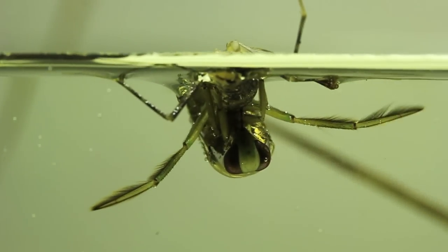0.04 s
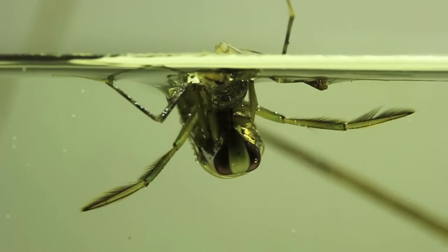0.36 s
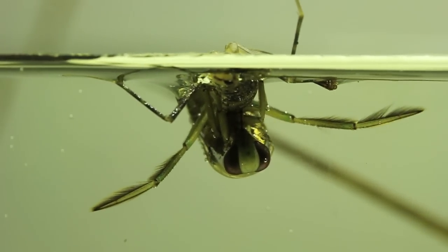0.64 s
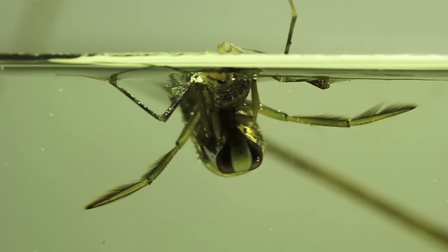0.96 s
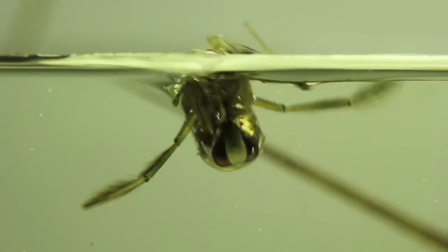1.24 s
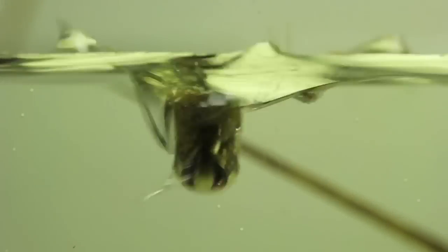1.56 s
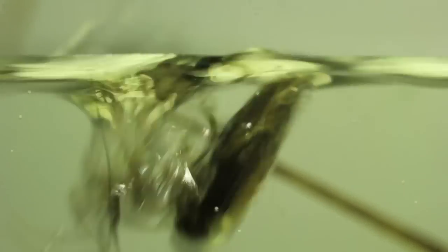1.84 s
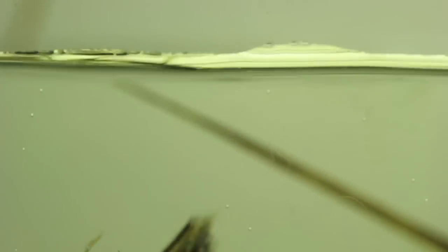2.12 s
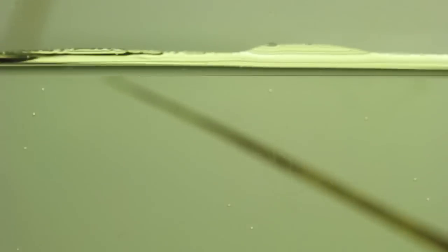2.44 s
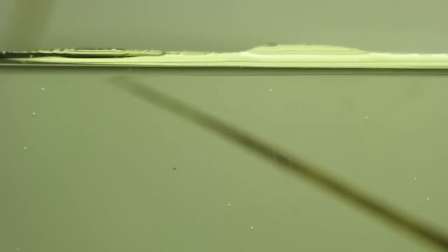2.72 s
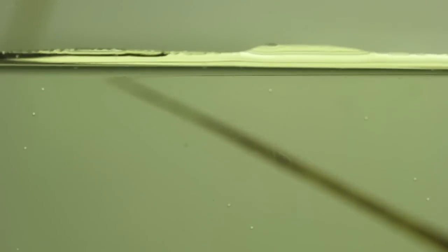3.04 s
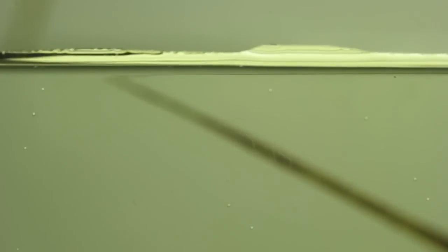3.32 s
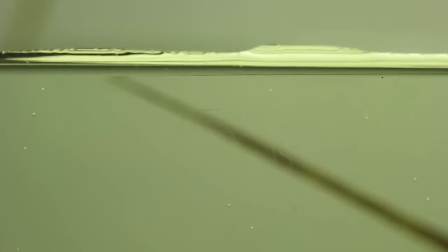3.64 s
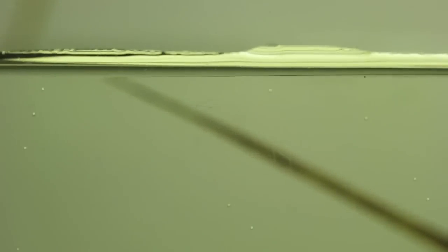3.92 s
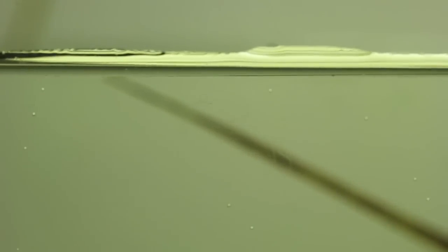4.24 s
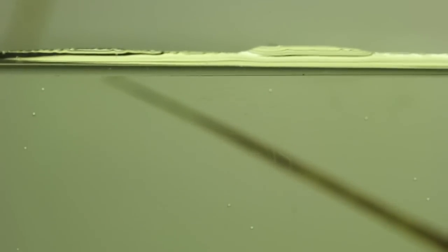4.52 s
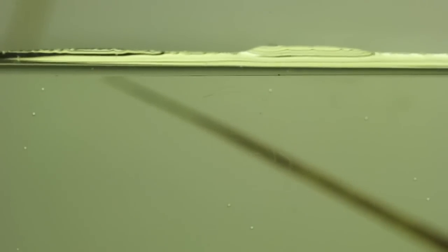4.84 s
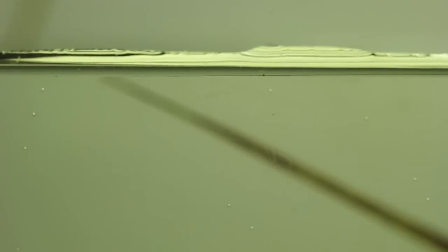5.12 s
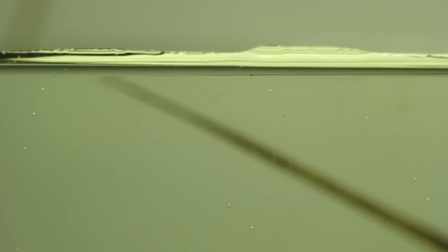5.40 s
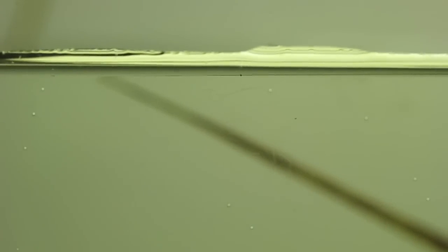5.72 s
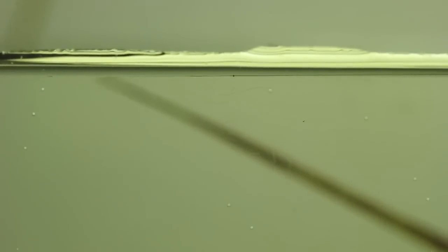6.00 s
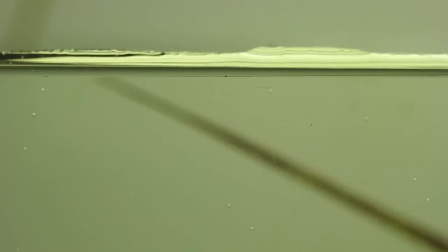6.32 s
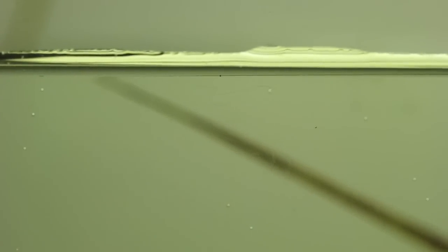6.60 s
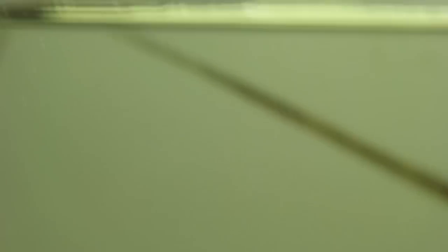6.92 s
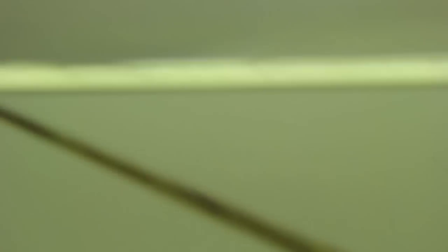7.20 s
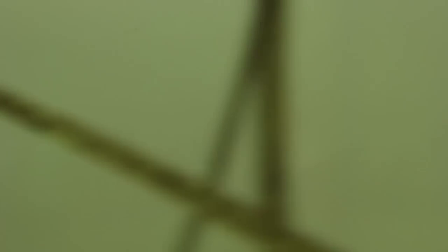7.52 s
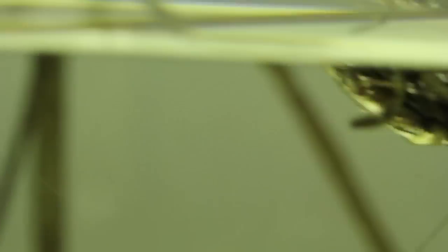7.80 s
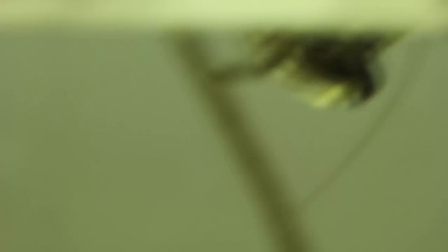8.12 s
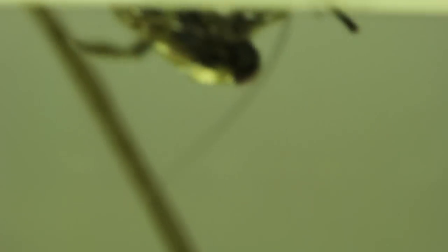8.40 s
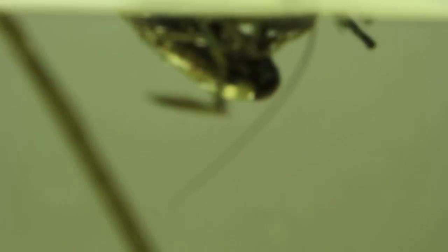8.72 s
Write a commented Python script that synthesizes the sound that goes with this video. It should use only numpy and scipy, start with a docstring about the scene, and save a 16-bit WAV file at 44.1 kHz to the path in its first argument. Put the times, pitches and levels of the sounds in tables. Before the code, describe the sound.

Close handling noise from a camera beside a fish tank in a small room: a few light plastic clicks, then soft rustles and short finger rubs that come more and more often. A low, steady pump hum and faint hiss lie underneath, with an occasional tiny bubble or tick. Finally the sticking mount gives a hollow scrape and a loud crack, then another scrape and a smaller, brighter snap.

```python
"""In a small room, at an aquarium, with the microphone on a camera close to the tank.
The pump and the mains hum steadily over faint hiss; tiny ticks and a bubble or two sound in between.
Right at the microphone, fingers brush and shift on the plastic body, more and more often.
As the camera is swung aside the hum changes colour, and the mount scrapes, sticks and lets go
with a few sharp cracks."""
import sys
import numpy as np
from scipy import signal
from scipy.fft import rfft, irfft
from scipy.io import wavfile

SR = 44100
rng = np.random.default_rng(int(sys.argv[2]) if len(sys.argv) > 2 else 0)


def store_pcm(level_fs):
    """Save levels as 16-bit WAV."""
    pcm = np.round(np.clip(level_fs, -1, 1) * 32767).astype(np.int16)
    wavfile.write(sys.argv[1], SR, np.atleast_2d(pcm).T)


N = 385875
TIME = np.arange(N) / SR


def amp(db):
    """Decibels to gain."""
    return 10 ** (np.asarray(db) / 20)


def unit(x):
    """Scales to rms 1."""
    return x / np.sqrt(np.mean(x ** 2) + 1e-20)


def burst(x):
    """Scales a short sound to the energy of one millisecond at rms 1."""
    return x / np.sqrt(np.sum(x ** 2) * 1000 / SR + 1e-20)


def add(mix, start_s, sound):
    """Lays a sound into the mix."""
    part = mix[max(round(start_s * SR), 0):][:len(sound)]
    part += sound[:len(part)]


def bell(f, centre_hz, octaves):
    """A bell curve of height 1 over log frequency."""
    return np.exp(-.5 * (np.log2(f / centre_hz) / octaves) ** 2)


def colour(x, spectrum, spot_hz=1000, spot_db=0, octaves=0.092):
    """Gives x a spectrum, with an optional extra resonance, at rms 1."""
    hz, db = np.transpose(spectrum)
    f = np.fft.rfftfreq(len(x), 1 / SR) + 1
    gain_db = np.interp(np.log(f), np.log(hz), db) + spot_db * bell(f, spot_hz, octaves)
    return unit(irfft(rfft(x) * amp(gain_db), len(x)))


def drift(rate_hz):
    """Random wander of rms 1, mostly slower than rate_hz."""
    f = np.fft.rfftfreq(N, 1 / SR)
    return unit(irfft(rfft(rng.standard_normal(N)) / (1 + (f / rate_hz) ** 4), N))


def slips(size, per_s=14000, spread_db=2):
    """Friction as a train of tiny slips of uneven size."""
    height = amp(spread_db * np.minimum(rng.exponential(1, size), 4))
    return height * rng.standard_normal(size) * (rng.random(size) < per_s / SR)


def ringing(modes):
    """The sum of an object's dying modes after one blow."""
    t = np.arange(4096) / SR
    return sum(amp(db - 60 * t / t60) * np.cos(2 * np.pi * hz * t) for hz, db, t60 in modes)


# The room's drone and the microphone's own hiss: f/Hz, relative density/dB
DRONE_SPECTRUM = [(20, -48), (45, -53), (58, -9), (84, -8), (96, 1.5), (112, -5.5), (138, -9.5),
                  (165, -9.5), (210, -19), (330, -17), (400, -22), (540, -23), (950, -36.5), (2000, -64)]
HISS_SPECTRUM = [(300, -4.5), (1050, -2.5), (1330, 0.5), (1600, -2), (2700, -6.5), (3200, -6.5),
                 (4200, -8.5), (8000, -12), (16000, -17)]
def room_tone(drone_db=-41, hiss_db=-59.5):
    """The noise floor: a low drone from the room, faint hiss from the microphone."""
    drone = amp(drone_db) * colour(rng.standard_normal(N), DRONE_SPECTRUM)
    hiss = amp(hiss_db) * colour(rng.standard_normal(N), HISS_SPECTRUM)
    return drone + hiss


# The microphone's path as the camera swings aside: t/s, share of the swing/0-1
SWING_PATH = [(0, 0), (5, 0.03), (7.2, 0.24), (8.75, 1)]
def swung(t):
    """How far the microphone has moved from its first position at time t."""
    return np.interp(t, *np.transpose(SWING_PATH))


# Pump and mains tones at the first position, close to the tank: f/Hz, rms level/dB
HUM_TONES = [(91.7, -49), (99.9, -48), (120.1, -54), (130.5, -75), (179.5, -52), (199.8, -40.5),
             (220.2, -49), (230.4, -59), (269.1, -54), (279.4, -46.5), (299.8, -49), (320.1, -59),
             (399.6, -85), (579.1, -64.5), (633.4, -64), (702.7, -74), (1298.8, -64.5)]
# The room's standing waves at the end of the swing: f/Hz, level change/dB
STANDING_WAVES = [(100, -2), (180, 3.5), (200, 1.5), (230, -2), (280, -5.5), (300, -13.5), (400, -2),
                  (640, 4.5), (1300, 1)]
def hum(waver_db=0.29, wander_hz=0.2457):
    """Pump and mains hum; their balance shifts as the microphone moves through standing waves."""
    out, moved = np.zeros(N), swung(TIME)
    for hz, db in HUM_TONES:
        cycles = np.cumsum(hz + wander_hz * drift(2.36)) / SR + rng.random()
        position_db = moved * np.interp(hz, *np.transpose(STANDING_WAVES))
        level_db = db + waver_db * drift(0.97) + position_db
        out += np.sqrt(2) * amp(level_db) * np.sin(2 * np.pi * cycles)
    return out


def room_echo(x, t60_s=0.099, tail_db=-14.5):
    """The direct sound, then the small room's short, weak tail from 4 ms on."""
    t = np.arange(SR // 2) / SR
    tail = rng.standard_normal(len(t)) * amp(-60 * t / t60_s) * (t > .004)
    return x + amp(tail_db) * signal.fftconvolve(x, tail / np.linalg.norm(tail))[:N]


# Ticks of the camera's controls, bubbles in the tank: t/s, level/dB, f/Hz, band spread/octaves
TICKS_AND_BUBBLES = [(3.758, -40.5, 8900, .39), (4.3217, -39.5, 4120, .067), (5.05, -45, 1030, .1),
                     (5.4494, -27, 13500, 0.26), (6.939, -37.5, 8000, 0.84), (7.037, -38, 9000, 0.93),
                     (7.562, -45, 11900, 0.63), (7.598, -38.5, 12000, .5), (7.661, -39, 10900, .58),
                     (7.764, -27.5, 5200, .9), (7.778, -36, 9000, .56), (8.438, -23.5, 5970, 0.16),
                     (8.555, -41, 7000, .8)]
def ticks_and_bubbles(t60_s=0.015):
    """Each small contact or bubble rings in one band; the narrower the band, the purer the pip."""
    out, t = np.zeros(N), np.arange(4096) / SR
    f = np.fft.rfftfreq(len(t), 1 / SR) + 1
    middle = len(t) // 2
    for start, db, hz, octaves in TICKS_AND_BUBBLES:
        kick = rng.standard_normal(len(t)) * amp(-60 * t / t60_s)
        centred = np.roll(kick, middle)  # the band filter spreads both ways in time
        pip = irfft(rfft(centred) * bell(f, hz, octaves))
        add(out, start - middle / SR, amp(db) * burst(pip))
    return out


# The hand at rest on the grip, next to the microphone: t/s, level/dB
CREEP_LEVELS = [(0, -66), (2.1, -68.5), (2.25, -59), (2.75, -64.5), (3.12, -55), (3.4, -57), (4.2, -57),
                (5.2, -59), (5.7, -56.5), (7.2, -60), (8.15, -54.5), (8.75, -59)]
# Its colour: f/Hz, relative density/dB
CREEP_SPECTRUM = [(500, 8), (1800, 0), (3800, -2), (7000, -5.5), (10000, -7), (16000, -7.5)]
def resting_hand(uneven_db=0.5):
    """The hand creeps on the grip with a soft, unbroken rustle."""
    level_db = np.interp(TIME, *np.transpose(CREEP_LEVELS)) + uneven_db * drift(7)
    return amp(level_db) * colour(rng.standard_normal(N), CREEP_SPECTRUM)


# The bright sheen of surfaces in contact at the microphone: f/Hz, relative density/dB
SHEEN_SPECTRUM = [(800, -28), (2500, -4), (5000, 0.5), (7700, -1), (9300, -3), (12000, 0), (14500, -3),
                  (16000, -35)]
def sheen(contact):
    """The treble of a contact: slips hiss, a jolt snaps."""
    return colour(contact, SHEEN_SPECTRUM)


# The plastic shell around the microphone, and its soft grip: f/Hz, relative density/dB
SHELL_SPECTRUM = [(400, -34), (1250, -12.5), (1650, 2), (2080, 0.5), (2520, 4), (2900, -3), (3350, 1.5),
                  (4300, -9.5), (5200, -6.5), (6000, -14.5), (7000, -11), (9000, -32), (16000, -22)]
GRIP_SPECTRUM = [(200, -35), (520, 3.5), (850, -2.5), (1370, 2), (1750, -1.5), (2300, -13), (3000, -24),
                 (6000, -12.5), (16000, -50)]
def friction(size, spot_hz, ring_db, grip_db):
    """Tiny slips ring the plastic shell, most at the touched spot's pitch, and scuff the soft grip."""
    shell = colour(slips(size, per_s=8000, spread_db=2.3), SHELL_SPECTRUM, spot_hz, ring_db)
    grip = colour(slips(size), GRIP_SPECTRUM)
    return shell + amp(grip_db) * grip


def stroke_shape(length_s, swell_share=0.2, fall_s=0.018, sag_db=3):
    """A finger presses in, eases as it slides (or bears down, if the sag is negative), then lifts."""
    t = np.arange(0, length_s + 4 * fall_s, 1 / SR)
    press = np.minimum(t / (swell_share * length_s), 1)
    ease = amp(sag_db * (1 - t / length_s))
    lift = np.exp(-np.maximum(t - length_s + fall_s / 2, 0) / fall_s)
    return press * ease * lift


def squeak(start_s=2.98, length_s=.21, level_db=-56.5, pitch_hz=1355):
    """A fingertip squeaks faintly: a slow stroke whose slips gather in one narrow band."""
    out, shape = np.zeros(N), stroke_shape(length_s, sag_db=-2)
    tone = colour(slips(len(shape)), GRIP_SPECTRUM, pitch_hz, spot_db=24, octaves=0.1)
    add(out, start_s, amp(level_db) * shape * tone)
    return out


# Handling noise, right at the microphone: t/s, length/s, rub level/dB, skin hiss level/dB
FINGER_STROKES = [(0.24, 0.1, -67, -78), (1.899, .25, -69, -78), (2.273, 0.037, -49, -53),
                  (2.526, 0.071, -55.5, -69), (3.253, 0.048, -64, -53), (3.676, 0.085, -60, -57),
                  (3.95, 0.072, -78, -51.5), (4.052, 0.1, -66, -54.5), (4.952, 0.075, -76, -60),
                  (5.271, .075, -66, -61), (5.822, 0.063, -48, -55), (6.03, .041, -55, -75),
                  (6.123, 0.066, -47.5, -61), (6.206, .16, -52, -70), (6.433, 0.12, -59, -80),
                  (6.781, 0.026, -44.5, -51.5), (6.832, 0.061, -43.5, -51), (6.997, 0.064, -46, -59),
                  (7.259, 0.042, -44.5, -54), (7.293, 0.11, -45.5, -54), (7.424, 0.045, -54, -71),
                  (7.494, 0.046, -53.5, -64), (7.764, .02, -39.5, -48), (8.168, 0.029, -43.5, -46.5),
                  (8.23, 0.051, -45.5, -49), (8.557, 0.036, -48, -57), (8.659, 0.051, -44.5, -49.5)]
def fingers(first_spot_hz=2450, rise_octaves=0.67, scatter_octaves=0.056, uneven_db=0.8):
    """Firm strokes ring the shell, light ones hiss; the ring rises as the hand follows the swing."""
    out, size = np.zeros(N), 16384
    for start, length, rub_db, skin_db in FINGER_STROKES:
        spot_octaves = rise_octaves * swung(start) + scatter_octaves * rng.standard_normal()
        rub = amp(rub_db) * friction(size, first_spot_hz * 2 ** spot_octaves, ring_db=5, grip_db=-5)
        skin = amp(skin_db) * sheen(slips(size))
        shape = stroke_shape(length)[:size]
        add(out, start, shape * (rub + skin)[:len(shape)])
    return out * amp(uneven_db * drift(73))


# Hollow modes of the mount that carries camera and microphone: f/Hz, relative level/dB, t60/s
MOUNT_MODES = [(532, -11.5, 0.057), (1100, -8, 0.0054), (1230, 2.5, 0.012), (1427, 4.5, 0.015),
               (1770, -11, 0.012), (2130, -6, 0.015), (2960, -9, 0.013), (3246, 1.5, 0.018),
               (5800, -14.5, 0.0063), (6180, -12, 0.0095), (7100, -9, 0.0076)]
def mount_ring(force):
    """A force on the mount sets its modes ringing."""
    return signal.fftconvolve(force, ringing(MOUNT_MODES))[:len(force)]


# Friction in the mount, in two pushes that each build to a crack: t/s, level/dB
DRAG_LEVELS = [(7.38, -74), (7.58, -56.5), (7.68, -45), (7.92, -48.5), (7.99, -67.5), (8.27, -58),
               (8.36, -49.5), (8.53, -47.5), (8.62, -63)]
def mount_drag(uneven_db=2.0, scrape_db=-1.5, hollow_db=-4, hiss_db=-17):
    """The mount scrapes unevenly while the camera is swung, and its slips sound its hollow modes."""
    push_db = np.interp(TIME, *np.transpose(DRAG_LEVELS), left=-np.inf, right=-np.inf)
    scrape = amp(scrape_db) * friction(N, spot_hz=2230, ring_db=4, grip_db=1.0)
    hollow = amp(hollow_db) * unit(mount_ring(slips(N, per_s=2500, spread_db=1.5)))
    hiss = amp(hiss_db) * sheen(slips(N))
    return amp(push_db + uneven_db * drift(60)) * (scrape + hollow + hiss)


def knock(mount_db, shell_db, snap_db, chatter_s, build_s=0.00058, soft_hz=2500, low_cut_hz=220):
    """A jolt with chatter rings mount and shell, and the contact snaps. Gives lead time and sound."""
    t = np.arange(4096) / SR
    lead_s = t[256]
    jolt = t == lead_s
    # small slips build up just before the jolt and die away after it
    slipping = np.exp(-np.maximum((lead_s - t) / build_s, (t - lead_s) / chatter_s))
    mount_chatter, shell_chatter, snap_chatter = 0.3 * rng.standard_normal((3, len(t))) * slipping
    # the heavy mount feels mostly the jolt, the light shell all of the chatter
    force = jolt + 0.37 * mount_chatter
    force = signal.lfilter([1], [1, -np.exp(-2 * np.pi * soft_hz / SR)], force)
    force = signal.lfilter(*signal.butter(2, low_cut_hz, "high", fs=SR), force)
    mount = amp(mount_db) * burst(mount_ring(force))
    shell = amp(shell_db) * burst(colour(jolt + shell_chatter, SHELL_SPECTRUM))
    snap = amp(snap_db) * burst(sheen(jolt + snap_chatter))
    return lead_s, mount + shell + snap


# Knocks on the shell, right at the microphone: t/s, shell level/dB, chatter decay/s
SHELL_TAPS = [(2.2315, -41.5, .0033), (2.266, -27.5, 0.0036), (2.33, -46, .003), (2.564, -41.5, .0045),
              (2.72, -44, .004), (6.305, -31.5, 0.0055), (6.527, -35, .006), (7.2766, -24.5, 0.012),
              (7.7972, -19.5, .0022), (8.5562, -35, .003)]
# Modes that ring on in the case after a tap: f/Hz, relative level/dB, t60/s
CASE_MODES = [(990, -7, .025), (1560, -1.5, .018), (2540, 5, 0.021), (3150, -7, 0.018), (5110, -6, 0.021)]
def taps(mount_db=-8.5, snap_db=-22, case_db=-4.5):
    """Taps start on the shell, ring the case and reach the mount weakly; levels are against the shell."""
    out = np.zeros(N)
    for start, db, chatter_s in SHELL_TAPS:
        lead_s, sound = knock(db + mount_db, db, db + snap_db, chatter_s)
        add(out, start - lead_s, sound)
        add(out, start, amp(db + case_db) * burst(ringing(CASE_MODES)))
    return out


# The mount letting go, close to the microphone: t/s, mount level/dB, snap level/dB
MOUNT_CRACKS = [(7.7851, -7.5, -52), (7.7988, -14, -45), (7.8233, -19, -65), (8.4385, -16.5, -29),
                (8.442, -17.5, -39)]
def cracks(rattle_db=2.5, rattle_slope=1.84):
    """The stuck mount breaks free; the harder the crack, the more the shell rattles."""
    out = np.zeros(N)
    for start, db, snap_db in MOUNT_CRACKS:
        shell_db = rattle_db + rattle_slope * db
        lead_s, sound = knock(db, shell_db, snap_db, chatter_s=0.0026)
        add(out, start - lead_s, sound)
    return out


def scene():
    """One microphone by the tank: hum behind, handling noise in front, clicks with the room's tail."""
    background = room_tone() + hum()
    handling = fingers() + resting_hand() + squeak() + mount_drag()
    clicks = cracks() + taps() + ticks_and_bubbles()
    return (background + handling + room_echo(clicks))[None]


def record(dry):
    """The camera cuts off the treble near 16 kHz."""
    low_pass = signal.firwin(511, 15950, window=("kaiser", 9), fs=SR)
    return signal.oaconvolve(dry, low_pass[None], "same")


dry = scene()
out = record(dry)
store_pcm(out)
```